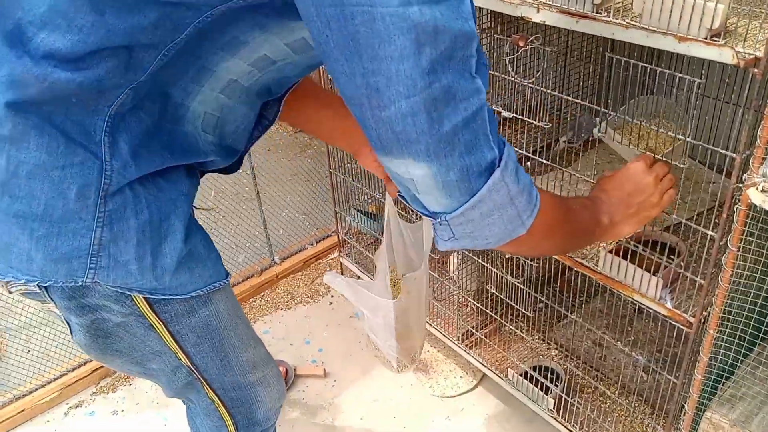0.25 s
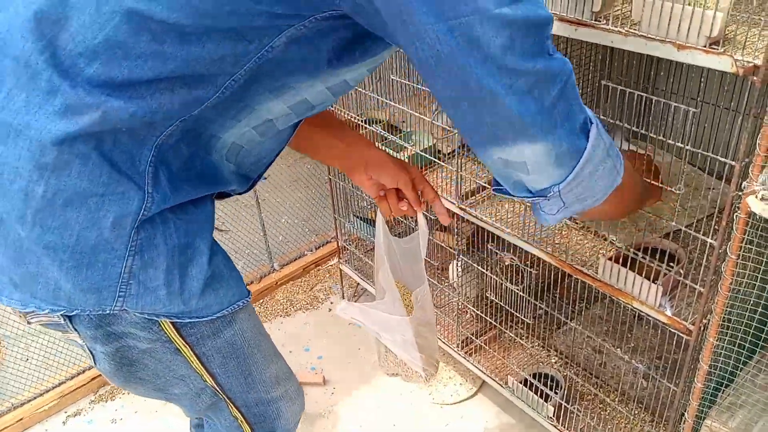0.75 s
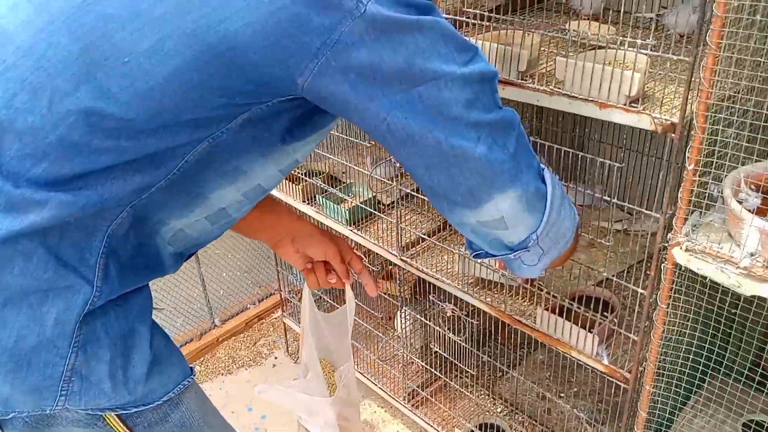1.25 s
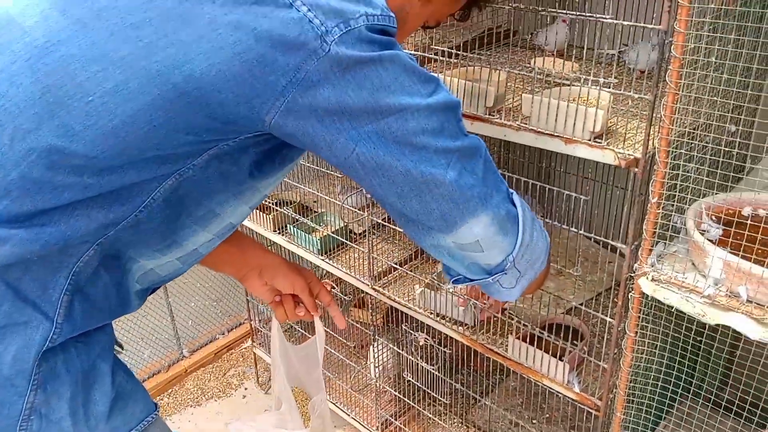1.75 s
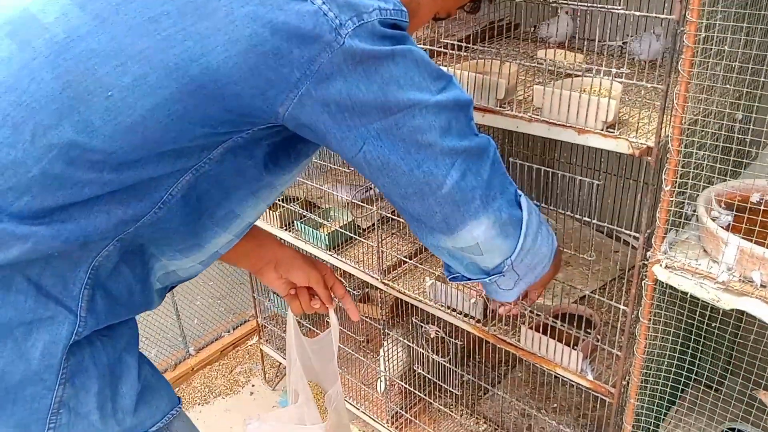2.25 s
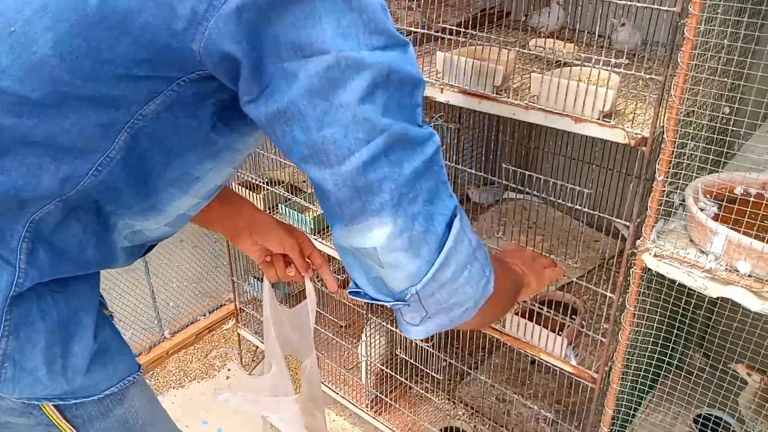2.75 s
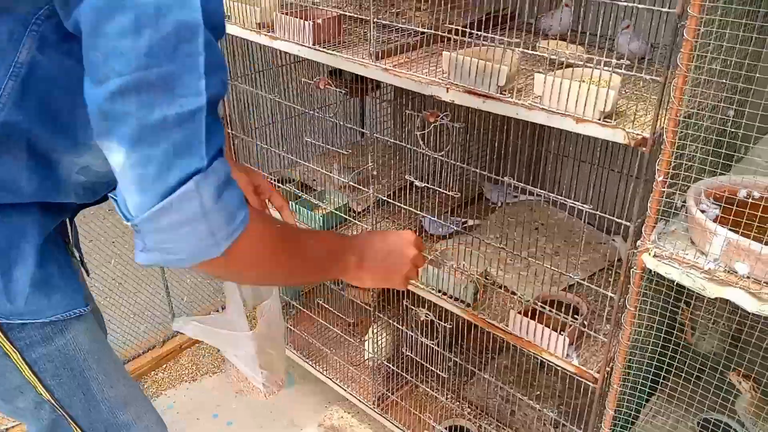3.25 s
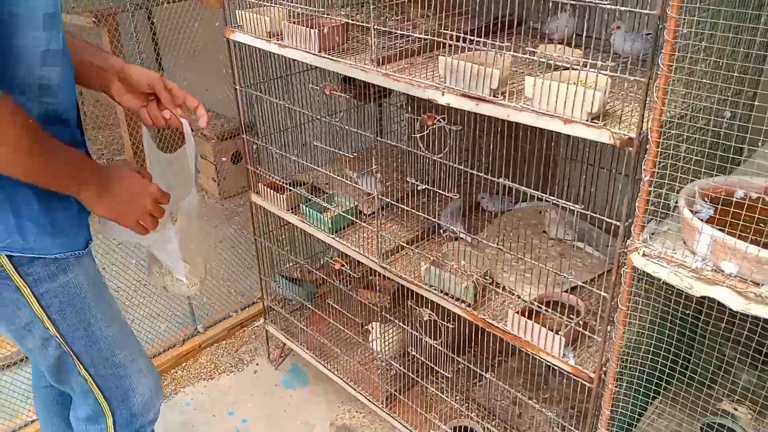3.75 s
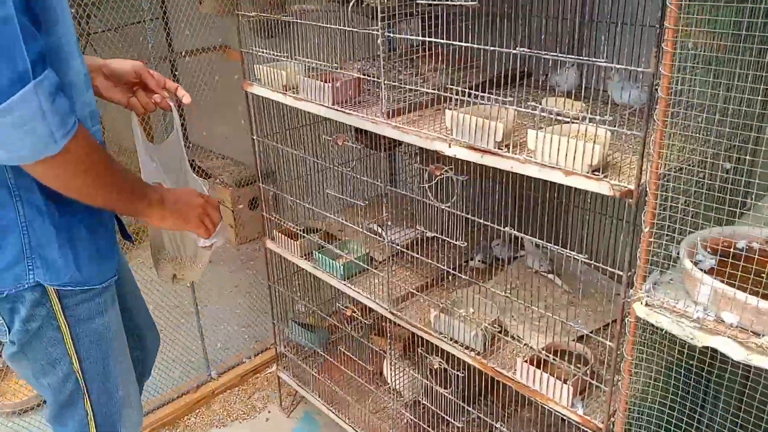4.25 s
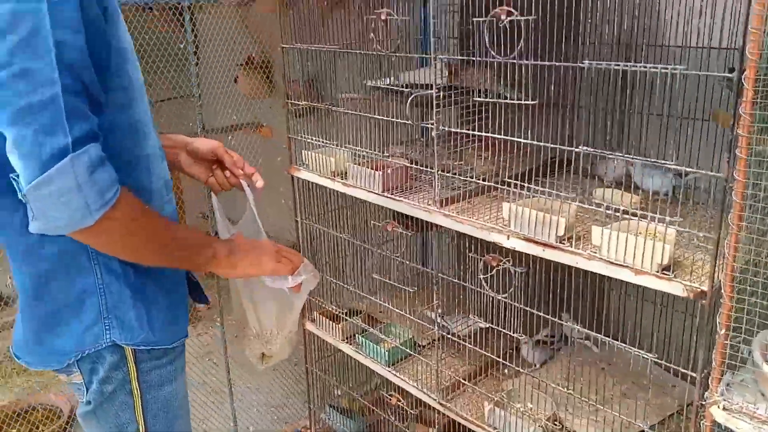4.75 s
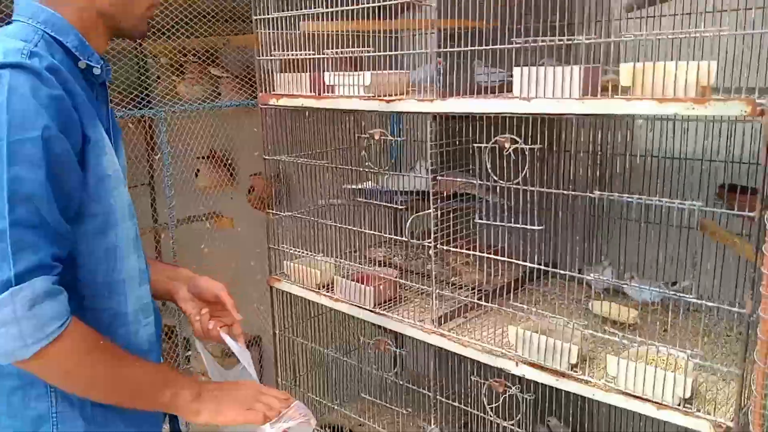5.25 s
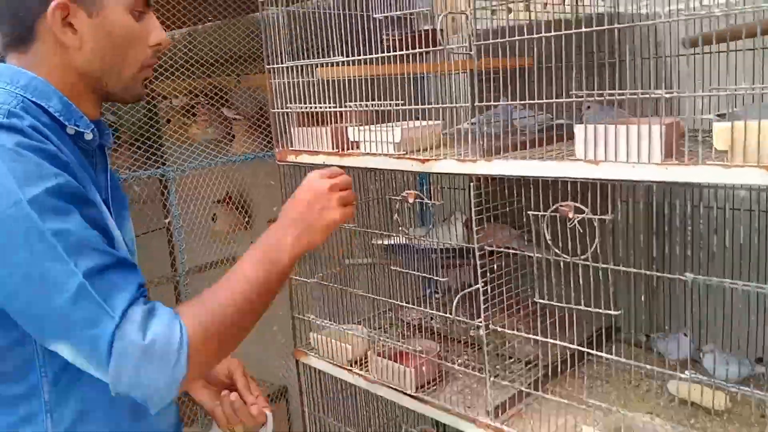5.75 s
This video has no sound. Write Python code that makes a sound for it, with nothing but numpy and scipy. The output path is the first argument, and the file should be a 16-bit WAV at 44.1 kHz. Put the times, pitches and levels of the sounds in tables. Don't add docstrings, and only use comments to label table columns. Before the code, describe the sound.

Seed rustles and cage wire ticks among soft bird chatter, then wings thump the cage and a close bird gives four harsh falling chirps.

```python
import sys
import numpy as np
from scipy import signal
from scipy.fft import rfft, irfft
from scipy.io import wavfile
from scipy.ndimage import uniform_filter1d, minimum_filter1d

SR = 44100
rng = np.random.default_rng(int(sys.argv[2]) if len(sys.argv) > 2 else 0)


def to_linear_factor(level_db):
    exponent = np.asarray(level_db, float) / 20
    return 10 ** exponent


def int16_out(signal):
    q = np.round(np.clip(np.atleast_2d(signal).T, -1, 1) * 32767)
    wavfile.write(sys.argv[1], SR, q.astype(np.int16))


N = 264600

# f/Hz, level/dB per Hz
AIR = [(35, -34), (60, -29), (131, -7.5), (279, 1), (550, -7.5), (864, -1.5), (1080, -8), (1570, 3.5),
       (1880, 4), (3480, -10.5), (4640, -29.5), (7140, -6.5), (8080, -14.5), (10500, -39), (17800, -120)]
# t/s, level/dB
GUSTS = [(0.0, -46.5), (0.06, -71), (0.13, -47), (0.17, -62), (0.32, -53), (0.37, -46), (0.53, -67),
         (1.12, -64), (1.19, -54), (1.42, -67), (1.49, -54), (1.97, -70.5), (2.1, -40.5), (2.14, -33),
         (2.24, -68.5), (2.66, -56), (2.89, -68), (2.96, -51), (3.16, -59), (3.23, -32.5), (3.31, -28),
         (3.54, -63), (3.58, -33.5), (3.59, -36), (3.68, -41), (3.72, -64), (3.76, -44), (3.93, -60),
         (3.99, -49), (4.06, -48), (4.11, -27.5), (4.29, -60.5), (4.53, -58), (4.6, -68), (5.08, -65),
         (5.13, -40), (5.16, -32), (5.23, -52), (5.26, -38.5), (5.4, -65.5), (5.45, -45.5), (5.53, -63),
         (5.58, -42.5), (5.63, -53), (5.78, -60), (5.88, -52), (6.0, -62)]
# f/Hz, level/dB per Hz
WIND = [(15, -55), (25, -43), (69, 1.5), (139, 3.5), (211, -6.5), (276, -16), (400, -34.5), (520, -63),
        (880, -120)]
# t/s, pitch f/Hz, level/dB
WHISTLES = [
    [(0.61, 3980, -52), (0.632, 3600, -34.5), (0.688, 3840, -51), (0.72, 3700, -47)],
    [(1.36, 1860, -53), (1.382, 1899, -49), (1.43, 1787, -42), (1.506, 1725, -53), (1.55, 1790, -52)],
    [(1.69, 3300, -50), (1.726, 3360, -53), (1.782, 3270, -71), (1.79, 3190, -72)],
    [(1.91, 1687, -64), (1.924, 1790, -50), (2.03, 1890, -42), (2.086, 1694, -52), (2.16, 1670, -63)],
    [(2.39, 3840, -48), (2.406, 3735, -46), (2.42, 3710, -39), (2.46, 3800, -66)],
    [(2.545, 3390, -63), (2.559, 3720, -39.5), (2.607, 3689, -35), (2.61, 3745, -43)],
    [(2.63, 1712, -48), (2.654, 1743, -50), (2.754, 1634, -45), (2.77, 1620, -67)],
    [(3.49, 3660, -55), (3.51, 2967, -34), (3.546, 2820, -71), (3.56, 2970, -67)],
    [(3.79, 3387, -70), (3.806, 3235, -50), (3.83, 2878, -60)],
    [(4.82, 1950, -41), (4.834, 2044, -36), (4.896, 2310, -39), (4.948, 2280, -36), (5.0, 2410, -27)],
    [(5.03, 2320, -39), (5.042, 2184, -38.5), (5.114, 1913, -47), (5.2, 1680, -44.5)],
]
# t/s, pitch f/Hz, level/dB
THIN_NOTES = [
    [(1.455, 5350, -58), (1.459, 5270, -56), (1.491, 5340, -46), (1.57, 5540, -56)],
    [(1.5, 5094, -57), (1.526, 4360, -45.5), (1.582, 4470, -52.5), (1.6, 4100, -65)],
]
# t/s, pitch f/Hz, level/dB, hoarseness [0-1]
BEEPS = [
    [(.16, 636, -62, 0.03), (.2, 656, -49, 0.14), (.26, 683, -51, 0.16), (.33, 666, -55, 0.3)],
    [(.39, 800, -45.5, 0.15), (.43, 833, -44, 0.14), (.5, 828, -45.5, 0.14), (.56, 810, -41, .1),
     (.62, 777, -60, 0.1)],
    [(.72, 600, -54, 0.2), (.78, 658, -46, 0.2), (.84, 667, -45, 0.14), (.9, 670, -45, 0.14),
     (.97, 661, -58, 0.2)],
    [(1.0, 640, -46, 0.84), (1.05, 665, -43.5, 0.56), (1.1, 640, -42, 0.77), (1.17, 613, -65, 0.8)],
    [(2.01, 600, -58, 0.15), (2.04, 639, -47, 0), (2.1, 676.4, -45, 0.14), (2.18, 699, -44.5, 0.09),
     (2.24, 690, -42, 0.44), (2.32, 675, -40, 0.87), (2.4, 651, -49.5, 0.94)],
]
# f/Hz, level/dB
BEAK = [(1200, -15), (2000, -27), (2600, -11.5), (3400, 2.5), (4100, 0), (4600, -12), (5400, -6.5),
        (6200, -16), (7500, -28), (9000, -44)]
# t/s, tray pitch f/Hz, wings and trays level/dB, flock chatter level/dB,
# seed and feathers level/dB
STIR = [
    [(0.0, 609, -64, -34, -38), (0.06, 1067, -48, -29, -49), (0.16, 569, -41, -48, -79),
     (0.22, 1050, -53, -51, -37), (0.25, 1010, -44.5, -36, -45), (0.32, 956, -66, -52, -77),
     (0.36, 463, -81, -45, -44), (0.42, 485, -45, -47.5, -54), (0.69, 463, -87, -47, -46.5),
     (0.91, 883, -56, -45.5, -64), (1.22, 629, -66, -43.5, -61), (1.31, 711, -41, -38.5, -47),
     (1.46, 300, -45.5, -51, -58), (1.49, 330, -59, -53, -62), (1.54, 922, -55, -49, -55),
     (1.64, 334.5, -57, -58, -77), (1.68, 367, -41, -48, -47), (1.73, 416, -49, -46, -71),
     (1.76, 861, -71, -50, -54), (1.99, 429, -74, -52.5, -70), (2.08, 268, -63, -46, -54),
     (2.24, 463, -45, -42.5, -50), (2.44, 441, -52, -42.5, -49), (2.53, 785, -75, -52, -83),
     (2.6, 794, -35.5, -33, -38.5), (2.71, 636, -69, -54, -62), (3.05, 387, -41.5, -40, -28.5),
     (3.13, 536, -40.5, -36, -26), (3.32, 267, -46, -56.5, -81), (3.47, 370, -71, -54, -75),
     (3.77, 361, -48, -54.5, -53), (3.92, 422, -66, -52, -56), (3.96, 403.4, -23.5, -34, -34),
     (4.01, 391, -18.5, -30, -34), (4.07, 386, -29.5, -34.5, -32), (4.17, 477, -39, -41.5, -52),
     (4.26, 337, -42, -41.5, -43), (4.27, 330.7, -43, -39.5, -32), (4.38, 540, -72, -52.5, -45),
     (4.43, 273, -68, -55, -55)],
    [(5.46, 396, -69, -54.5, -50), (5.534, 505, -86, -48, -37), (5.606, 481, -49, -50, -38),
     (5.694, 483, -64, -54, -54), (5.814, 426, -72, -57, -68), (5.87, 445, -77, -53, -68),
     (5.976, 510, -62, -56, -49), (6.0, 519, -53, -53, -81)],
]
# t/s, tray pitch f/Hz, tray level/dB, wire level/dB, seed level/dB, time to fall 60 dB t/s
KNOCKS = [(.056, 1120, -40, -36, -19.5, 0.073), (.231, 1130, -25.5, -25.5, -26.5, 0.09),
          (.341, 703, -63, -32, -24.5, .08), (0.468, 500, -61, -45, -33, .06),
          (.626, 920, -58, -50, -44.5, 0.19), (1.009, 800, -63, -58, -41, 0.088),
          (1.284, 808, -46, -35, -36, 0.094), (1.508, 1070, -42, -43, -56, 0.054),
          (1.668, 358.5, -32, -41.5, -48, 0.079), (1.75, 798, -31, -51, -55, 0.18),
          (1.795, 900, -63, -34, -47, 0.066), (1.829, 830, -41, -46, -48, 0.12),
          (1.939, 610, -64, -48, -46, 0.069), (2.428, 495, -52, -49, -38, 0.052),
          (2.581, 802.4, -20, -27, -21, 0.095), (3.0, 502, -31, -44, -55, 0.17),
          (3.03, 394, -33, -23, -55, 0.25), (3.745, 350, -35, -38, -41, 0.071),
          (3.848, 386, -49, -45, -43, 0.081), (3.945, 606, -28, -27, -35, 0.12),
          (3.965, 405, -25, -16, -28, 0.066), (4.001, 397.6, -16.5, -18, -34, .15),
          (4.12, 595, -30, -31.5, -47, 0.27), (4.266, 492, -66.5, -22.5, -22.5, 0.16)]
# f/Hz, level/dB per Hz
BOARD = [(150, -32), (220, 3.5), (400, 5), (800, 3), (1300, -2.5), (1800, -48)]
# f/Hz, width f/Hz, level/dB
WIRE = [(1440, 103, 3), (2290, 170, 4.5), (2900, 300, -1), (3600, 254, 1.5), (4070, 160, -8.5)]
# f/Hz, level/dB per Hz
SEED = [(3800, -26), (4900, -7.5), (6000, 0.5), (7100, 1), (8200, 3), (10000, -1), (14000, -21)]
# t/s, pitch f/Hz, level/dB of the 1st, 2nd and 3rd harmonic
CRIES = [
    [(4.435, 2915, -30, -35, -33), (4.445, 2633, -26, -21, -36), (4.46, 2512, -26.5, -27, -27),
     (4.478, 2480, -23, -17, -28), (4.486, 2340, -38, -26, -38), (4.51, 2325, -25, -35, -31.5),
     (4.53, 2126, -15.5, -22, -32)],
    [(4.686, 2900, -27, -32, -39), (4.697, 2900, -16, -30, -36), (4.71, 2760, -23, -21, -29),
     (4.73, 2496, -19, -26, -35), (4.75, 2456, -33, -28, -28), (4.775, 2290, -21, -26, -41)],
    [(4.95, 4120, -24, -16, -53), (4.957, 3600, -17, -30, -50), (4.967, 3090, -9.5, -36, -43),
     (4.98, 2900, -28.5, -21.5, -30), (5.0, 2780, -36, -25, -29), (5.03, 2580, -42, -28, -31)],
    [(5.227, 3020, -24, -32, -51), (5.236, 3350, -23, -34, -39), (5.25, 3175, -29.5, -30.5, -24),
     (5.265, 2950, -16, -19, -33), (5.28, 2730, -23, -31, -28), (5.295, 2450, -35, -30, -28)],
]
# t/s, upper voice f/Hz, then level/dB of upper voice, lower voice, rasp and throat
SCREECHES = [
    [(4.523, 5540, -19, -22, -13, -31), (4.537, 6270, -14, -21, -26, -44), (4.55, 6110, -31, -26, -36, -42),
     (4.567, 6200, -25, -15.5, -31, -35), (4.6, 6170, -29.5, -26.5, -41, -38),
     (4.66, 6110, -46, -39, -54, -56)],
    [(4.77, 5030, -20, -34, -14, -10.5), (4.782, 5840, -13.5, -37, -24, -37),
     (4.797, 6170, -20.5, -26, -35, -40), (4.82, 6030, -30.5, -34, -33.5, -34.5),
     (4.92, 6030, -46, -45, -50, -45)],
    [(5.02, 5270, -22, -22, -10, -20), (5.035, 5910, -15, -27, -26.5, -19.5),
     (5.05, 6580, -18.5, -27, -32, -33), (5.08, 6305, -25, -33, -32.5, -30),
     (5.13, 6280, -34, -44, -39, -37), (5.2, 6190, -46, -48, -37, -41)],
    [(5.285, 5230, -25, -24, -24, -26), (5.297, 5005, -20, -19.5, -16, -31.5),
     (5.312, 5990, -13.5, -27.5, -34, -26), (5.325, 6520, -15.5, -23, -26, -24.5),
     (5.36, 6030, -27.5, -32, -34, -34), (5.44, 6280, -40, -48, -57, -60)],
]
# f/Hz, level/dB
MIC = [(1000, -3.5), (7500, 2.5), (8500, -13.5), (10000, -21), (13000, -40.5), (16000, -57)]


def column(rows, k):
    rows = np.array(rows)
    return np.interp(np.arange(N) / SR, rows[:, 0], rows[:, k])


def span(rows):
    times, *cols = np.transpose(rows)
    at = np.arange(round(times[0] * SR), min(round(times[-1] * SR), N))
    t = at / SR
    gate = np.clip(np.minimum(t - times[0], times[-1] - t) / 0.0044, 0, 1)
    return at, gate, [np.interp(t, times, c) for c in cols]


def rms_one(x):
    return x / np.sqrt(np.mean(x ** 2) + 1e-20)


def at_hz(points, hz):
    table_hz, db = np.transpose(points)
    return np.interp(np.log(hz + 1), np.log(table_hz), db)


def drift(hz, size=N):
    r = np.exp(-2 * np.pi * hz / SR)
    noise = rng.standard_normal(size + 9000)
    smooth = signal.lfilter([1], [1, -2 * r, r * r], noise)
    return rms_one(smooth[9000:])


def colour(x, spectrum):
    hz = np.fft.rfftfreq(len(x), 1 / SR)
    return irfft(rfft(x) * to_linear_factor(at_hz(spectrum, hz)), len(x))


def band(x, low_hz, high_hz):
    return signal.sosfilt(signal.butter(3, [low_hz, high_hz], "band", fs=SR, output="sos"), x)


def resonate(x, peaks):
    out = 0
    for k, (hz, width_hz, db) in enumerate(peaks):
        r = np.exp(-np.pi * width_hz / SR)
        poles = [1, -2 * r * np.cos(2 * np.pi * hz / SR), r * r]
        ring = signal.lfilter([1, 0, -1], poles, x) * (1 - r * r) / 2
        out = out + (-1) ** k * to_linear_factor(db) * ring
    return out


def grains(per_s, spread_db):
    sizes = to_linear_factor(spread_db * np.minimum(rng.exponential(1, N), 5)) * rng.choice([-1, 1], N)
    return sizes * (rng.random(N) < per_s / SR) + 1e-18


def turns(hz, wobble, wobble_hz):
    unsteady_hz = hz * (1 + wobble * drift(wobble_hz, size=len(hz)))
    return 2 * np.pi * np.cumsum(unsteady_hz) / SR


def hollow(hz, width_hz):
    r = np.exp(-np.pi * width_hz / SR)
    size = len(hz)
    taps = rng.standard_normal((2, size)) * (rng.random(size) < 900 / SR) + 1e-18
    swell = signal.lfilter([1], [1, -2 * r, r * r], taps[0] + 1j * taps[1])
    return rms_one(np.real(swell * np.exp(2j * np.pi * np.cumsum(hz) / SR)))


def air():
    return to_linear_factor(-53.5) * rms_one(colour(rng.standard_normal(N), AIR))


def wind():
    rumble = rms_one(colour(rng.standard_normal(N), WIND))
    return to_linear_factor(column(GUSTS, 1) + 2.86 * drift(12)) * rumble


def shed_echo(x):
    t60_s = 0.27
    t = np.arange(round(.5 * SR)) / SR
    echoes = rms_one(grains(4000, spread_db=3.5)[:len(t)])
    tail = echoes * to_linear_factor(-60 * t / t60_s) * (t > .003)
    return signal.fftconvolve(x, tail / np.sqrt(np.sum(tail ** 2)))[:N]


def flock():
    voices = 0
    for hz in (1633, 1943, 2340, 2744, 3225, 3650):
        voice = hollow(hz * (1 + .05 * drift(4)), width_hz=174)
        voices = voices + to_linear_factor(7.8 * drift(4.9)) * voice
    blur = band(rng.standard_normal(N), 1240, 3670)
    return rms_one(rms_one(voices) + to_linear_factor(-1) * rms_one(blur))


def whistles():
    out = np.zeros(N)
    for rows in [*WHISTLES, *THIN_NOTES]:
        at, gate, (hz, db) = span(rows)
        tone = np.sin(turns(hz, wobble=0.0246, wobble_hz=120))
        out[at] += gate * to_linear_factor(db + 6 + 4.16 * drift(100, size=len(at))) * tone
    return out


def finches():
    out = np.zeros(N)
    for rows in BEEPS:
        at, gate, (hz, db, hoarse) = span(rows)
        phase = turns(hz, wobble=0.063 * hoarse, wobble_hz=197)
        for k in range(2, 14):
            level_db = db + 2 + at_hz(BEAK, k * hz) + 2.5 * drift(25, size=len(at))
            out[at] += gate * to_linear_factor(level_db) * np.sin(k * phase)
    return out


def stirring(board, seed):
    rows = np.concatenate(STIR)
    tray = hollow(column(rows, 1), width_hz=210) + board
    out = to_linear_factor(column(rows, 2) - 0.5) * tray
    out += to_linear_factor(column(rows, 3) + 0.5) * flock()
    return out + to_linear_factor(column(rows, 4) - 8) * seed


def knocks(board, wire, seed):
    out = np.zeros(N)
    for start, hz, tray_db, wire_db, seed_db, t60 in KNOCKS:
        at = np.arange(round(start * SR), min(round((start + .25) * SR), N))
        t = at / SR - start
        swell = (1 - np.exp(-t / (0.027 * t60))) ** 2 * to_linear_factor(-60 * t / t60)
        tray = hollow(np.full(len(at), hz), width_hz=83) + to_linear_factor(-2) * board[at]
        out[at] += swell * (to_linear_factor(tray_db) * tray + to_linear_factor(wire_db) * wire[at] + to_linear_factor(seed_db) * seed[at])
    return out


def cage():
    board = rms_one(colour(grains(1500, spread_db=0.5), BOARD))
    wire = rms_one(resonate(grains(2300, spread_db=3.0), WIRE))
    seed = rms_one(colour(grains(6000, spread_db=1.5), SEED)) * to_linear_factor(2 * drift(29))
    return stirring(board, seed) + knocks(board, wire, seed)


def cries():
    out = np.zeros(N)
    for rows in CRIES:
        at, gate, (hz, *levels) = span(rows)
        phase = turns(hz, wobble=.008, wobble_hz=200)
        other = turns(1.06 * hz, wobble=0.0158, wobble_hz=80)
        for k, db in enumerate([*levels, levels[2] - 3], start=1):
            both = np.sin(k * phase) + to_linear_factor(-5) * np.sin(k * other)
            out[at] += gate * to_linear_factor(db + 5.5 + 3.1 * drift(91, size=len(at))) * both
    return out


def screeches():
    out = np.zeros(N)
    rasp = rms_one(band(grains(2500, spread_db=4.5), 3050, 4900))
    hiss = rms_one(band(grains(3700, spread_db=10), 6800, 16000))
    for rows in SCREECHES:
        at, gate, (hz, upper_db, lower_db, rasp_db, throat_db) = span(rows)
        upper_flutter = to_linear_factor(3.14 * drift(201, size=len(at)))
        lower_flutter = to_linear_factor(2.94 * drift(300, size=len(at)))
        phase = turns(hz, wobble=0.028, wobble_hz=310)
        upper = np.sin(phase) + to_linear_factor(-17) * np.sin(2 * phase)
        phase = turns(.83 * hz, wobble=0.0253, wobble_hz=300)
        lower = np.sin(phase) + to_linear_factor(-13) * np.sin(2 * phase)
        throat = np.sin(turns(.43 * hz, wobble=0.062, wobble_hz=282))
        out[at] += gate * to_linear_factor(upper_db) * upper_flutter * upper
        out[at] += gate * lower_flutter * (to_linear_factor(lower_db) * lower + to_linear_factor(throat_db) * throat)
        out[at] += gate * to_linear_factor(rasp_db - 0.5) * (rasp[at] + to_linear_factor(-2.5) * hiss[at])
    return out


def near_bird():
    return cries() + screeches()


def scene():
    birds = whistles() + finches() + near_bird()
    close = cage()
    echo = to_linear_factor(-5.5) * shed_echo(birds + .5 * close)
    near = colour(birds + close + echo, MIC)
    return (air() + wind() + near)[None]


def low_pass(x):
    return signal.sosfilt(signal.butter(12, 15500, fs=SR, output="sos"), x)


def record(dry):
    peak = -minimum_filter1d(-np.abs(dry), size=301)
    ease = uniform_filter1d(np.minimum(1, .84 / (peak + 1e-9)), size=151)
    return low_pass(dry * ease)


dry = scene()
out = record(dry)
int16_out(out)
```